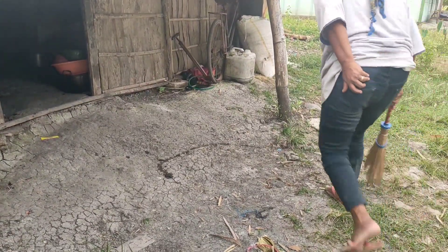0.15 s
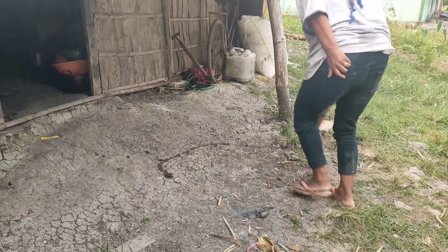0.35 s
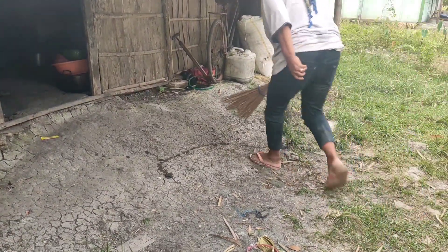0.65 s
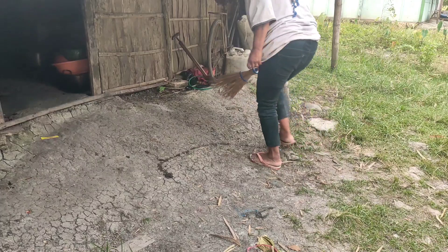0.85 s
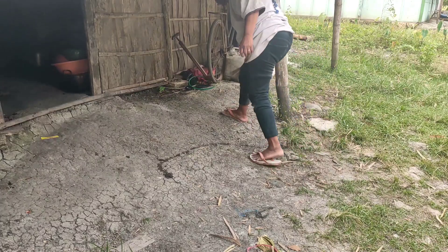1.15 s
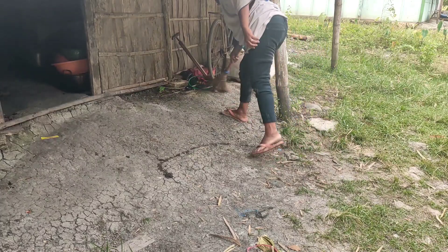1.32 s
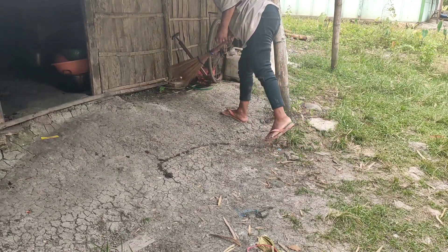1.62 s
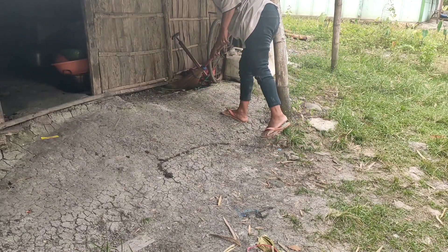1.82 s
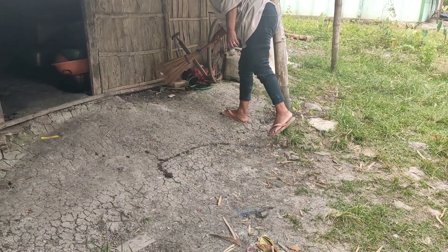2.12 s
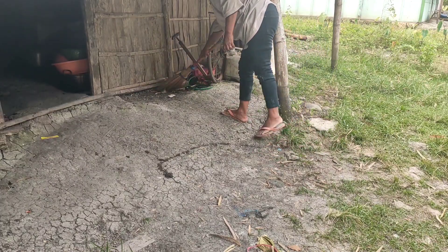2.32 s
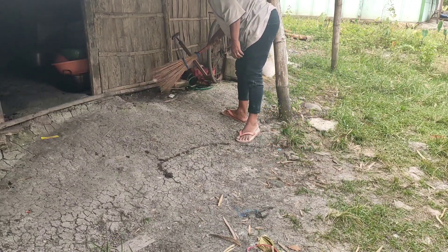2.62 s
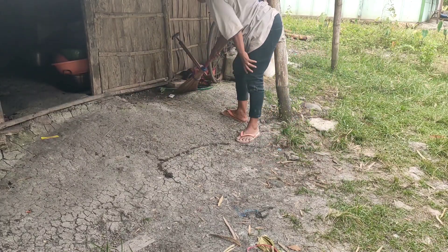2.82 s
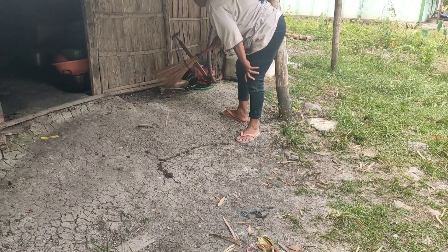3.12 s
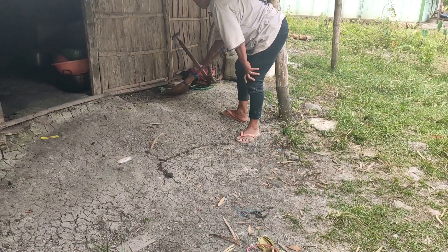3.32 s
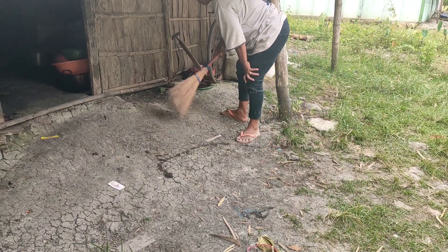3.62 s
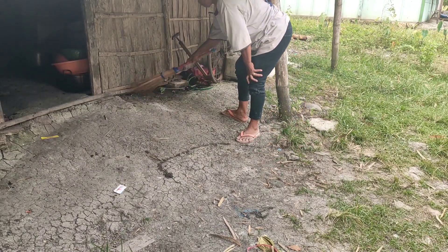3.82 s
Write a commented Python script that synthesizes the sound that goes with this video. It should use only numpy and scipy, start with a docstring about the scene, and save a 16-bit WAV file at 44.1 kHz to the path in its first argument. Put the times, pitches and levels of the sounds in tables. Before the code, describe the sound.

Sandal scuff, dull knocks and a sharp rubbery slap lead into five dry, scratchy broom strokes on bare ground in an open yard; thin chick whistles, quiet distant hush and low wind rumble at the stereo microphones.

```python
"""A stiff twig broom sweeps packed dirt in a farm yard: five scraping strokes built from uneven
clicks, hiss and snaps, with three extra touches of the twig tips. Before that, sandals scuff
the ground and slap as ringing resonances with a puff of noise; dull knocks are noise bursts.
Chicks whistle nearby as wavering sines, over a patchy bed of far-off noise and
light wind that rumbles at the two microphones."""
import sys
import numpy as np
from scipy import signal
from scipy.io import wavfile
from scipy.ndimage import uniform_filter1d

SR = 44100
rng = np.random.default_rng(int(sys.argv[2]) if len(sys.argv) > 2 else 0)


def nominal_scale(level):
    """Amplitude ratio for a level in decibels (scalar or array-like)."""
    x = np.asarray(level, float) / 20
    return 10 ** x


def output_pcm(signal):
    """Save a mono or channel-first signal as 16-bit PCM at the path in sys.argv[1].

    Samples are clipped to [-1, 1] before scaling.
    """
    pcm = np.clip(np.atleast_2d(signal).T, -1, 1) * 32767
    wavfile.write(sys.argv[1], SR, np.round(pcm).astype(np.int16))


N = 174195  # samples


def evened(x):
    """Scales to rms 1."""
    return x / np.sqrt(np.mean(x ** 2) + 1e-20)


def read(points, hz):
    """Reads a spectrum on a log frequency axis."""
    f, value = np.transpose(points)
    return np.interp(np.log(hz + 1), np.log(f + 1), value)


def curve(rows, column=1):
    """One column of a curve at every sample, -120 outside it."""
    rows = np.array(rows)
    return np.interp(np.arange(N) / SR, rows[:, 0], rows[:, column], left=-120, right=-120)


def add(mix, s, sound):
    """Mixes a sound in at time s."""
    part = mix[..., round(s * SR):][..., :sound.shape[-1]]
    part += sound[..., :part.shape[-1]]


def band(x, hz, width_hz):
    """Noise through a steep resonance that may move: shifted to 0 Hz, low-passed twice, shifted back."""
    turn = np.exp(2j * np.pi * np.cumsum(hz * np.ones(x.shape[-1])) / SR)
    r = np.exp(-np.pi * width_hz / SR)
    once = signal.lfilter([1 - r], [1, -r], x / turn)
    twice = signal.lfilter([1 - r], [1, -r], once)
    return evened((turn * twice).real)


def colour(pair, shape, same, lean, patchy_db, streaky, lead_s, sink):
    """Blends two raw signals to stereo and shapes their short-time spectra with random unevenness."""
    size = 1024
    hz, t, z = signal.stft(pair, SR, nperseg=size, noverlap=size * 3 // 4)
    # random patches vary the level across the whole spectrum
    patches, streaks = rng.standard_normal((len(t), len(hz), 2)).T
    patches = uniform_filter1d(patches, size=14, axis=0)
    patches = evened(uniform_filter1d(patches, size=6, axis=1))
    # narrow random streaks add finer unevenness, strongest in the treble
    streaks = evened(uniform_filter1d(streaks, size=9, axis=1))
    streaks = streaks * np.clip(hz / 5000, .3, 1.6)[:, None]
    # the right microphone shares part of the left one's sound, later by lead_s
    c = np.clip(read(same, hz), -1, 1)[:, None]
    late = np.exp(-2j * np.pi * hz * lead_s)[:, None]
    side = read(lean, hz)[:, None] / 2
    left = z[0] * nominal_scale(side)
    right = (c * late * z[0] + np.sqrt(1 - c ** 2) * z[1]) * nominal_scale(-side)
    # a sink above 1 moves the whole spectrum down
    sunk_hz = hz[:, None] * np.interp(t, np.arange(N) / SR, sink)
    shape_db = read(shape, sunk_hz) + patchy_db * patches + 2.07 * streaky * np.minimum(streaks, 1)
    z = np.array([left, right]) * nominal_scale(shape_db)
    return evened(signal.istft(z, SR, nperseg=size, noverlap=size * 3 // 4)[1][:, :N])


def yard(x):
    """Short diffuse tail from the shed wall and the ground: decaying softened noise as echo taps."""
    t60_s, rise_s = 0.11, 0.0063
    t = np.arange(SR // 3) / SR
    taps = rng.standard_normal((2, len(t))) * nominal_scale(-60 * t / t60_s) * np.minimum(t / rise_s, 1)
    taps = signal.lfilter([.5], [1, -.5], taps)
    return signal.oaconvolve(x, taps / np.linalg.norm(taps[0]), axes=1)[:, :N]


def air():
    """Far leaves, traffic and insects as one patchy bed of shaped noise."""
    # Spectrum of the distance. Each row: frequency in Hz, relative density in dB.
    far_spectrum = [(12, -24), (20, -62), (123, 1), (197, 4), (888, -8.5), (3690, -3.5), (4610, -10),
                    (7610, -19.5), (8750, -25), (10300, -19.5), (11900, -34), (14100, -28), (15700, -25)]
    # Likeness of the two microphones. Each row: frequency in Hz, left-right likeness from 0 to 1.
    far_same = [(60, 1), (240, 0.67), (950, 0.015), (3770, 0.048), (15000, 0.039)]
    level_db = -50
    noise = rng.standard_normal((2, N))
    return nominal_scale(level_db) * colour(noise, far_spectrum, far_same, [(20, 0), (15000, 0)],
                                  patchy_db=3.5, streaky=5.5, lead_s=0, sink=np.ones(N))


def wind():
    """Rumble in a low moving resonance, alike at both microphones, and lumpy buffeting unrelated at each."""
    # Low wind rumble. Each row: time in seconds, level in dB, centre in Hz.
    gusts = [(0.0, -50, 75.6), (0.08, -54.5, 78), (0.14, -64, 81.5), (1.0, -66, 84.5), (1.21, -59, 74.6),
             (1.29, -92, 77), (1.4, -101, 102), (1.47, -45.5, 93.5), (1.61, -61, 79.4), (1.81, -41.5, 70),
             (1.85, -63, 72), (2.07, -60, 54.7), (2.62, -63.5, 56.5), (3.0, -61.5, 56.6), (3.12, -59, 83),
             (3.16, -42, 87), (3.27, -47.5, 71), (3.33, -50, 89), (3.4, -46.5, 88.5), (3.56, -49, 72),
             (3.64, -67, 58.2), (3.76, -57, 56.0), (3.95, -69, 61.6)]
    gust_width_hz = 32.6
    buffet_db, buffet_hz, buffet_width_hz, buffet_lumps_db = -61, 37, 20, 3.5
    a, b, c, d, lumps = rng.standard_normal((5, N))
    near_alike = np.array([a + 0.18 * b, a - 0.07 * b])
    rumble = nominal_scale(curve(gusts)) * band(near_alike, curve(gusts, column=2), gust_width_hz)
    lumps = evened(uniform_filter1d(uniform_filter1d(lumps, size=4000), size=4000))
    buffeting = band(np.array([c, d]), buffet_hz, buffet_width_hz)
    return rumble + nominal_scale(buffet_db + buffet_lumps_db * lumps) * buffeting


def chicks():
    """Near-sine whistles that waver and flutter, and short gliding chirps, blurred by the yard."""
    # Chick whistles, one list per whistle. Each row: time in seconds, pitch in Hz, level in dB.
    whistles = [
        [(0.325, 4270, -55), (0.347, 3310, -46), (0.375, 3340, -50)],
        [(0.47, 4420, -51), (0.482, 4120, -52.5), (0.62, 3900, -53), (0.64, 3970, -54)],
        [(0.45, 3420, -52), (0.472, 3670, -55), (0.63, 3610, -53), (0.69, 3605, -41), (0.718, 3815, -53),
         (0.762, 3786, -45.5), (0.792, 3560, -49), (0.81, 3060, -67)],
        [(0.586, 3430, -56), (0.63, 3310, -52), (0.665, 3220, -54), (0.69, 2750, -58)],
        [(0.79, 2730, -42), (0.797, 2240, -47), (0.808, 1950, -50)],
        [(0.97, 3755, -73), (0.985, 3570, -51.5), (1.045, 3620, -47), (1.11, 3800, -50), (1.135, 3310, -58)],
        [(0.975, 4020, -67), (0.985, 3950, -57), (1.06, 3850, -57)],
        [(1.065, 2570, -55), (1.078, 3080, -49), (1.088, 3170, -52), (1.1, 2710, -50), (1.125, 2830, -56)],
        [(1.275, 3230, -62), (1.293, 3620, -59), (1.33, 3760, -57)],
        [(2.19, 4100, -51.5), (2.206, 3894, -45), (2.268, 3800, -47.5), (2.33, 3540, -46.5), (2.35, 3320, -55)],
        [(3.9, 4130, -43.5), (3.918, 4040, -58), (3.95, 4050, -49)],
    ]
    # Short chirps. Each row: start in seconds, length in seconds, start pitch in Hz, end pitch in Hz,
    # level in dB.
    chirps = [(0.251, 0.05, 4470, 3780, -56), (0.31, 0.021, 4310, 3520, -57),
              (.575, 0.011, 3000, 2300, -66), (1.133, 0.019, 2160, 1950, -54),
              (1.117, 0.028, 2960, 3280, -51), (2.333, 0.016, 2760, 1900, -49)]
    waver_share, flutter_db, yard_db = .009, 2.2, -8
    out = np.zeros(N)
    for rows in whistles:
        waver, flutter = uniform_filter1d(rng.standard_normal((2, N)), size=120, axis=1)
        hz = np.maximum(curve(rows), 0) * (1 + waver_share * evened(waver))
        level = uniform_filter1d(nominal_scale(curve(rows, column=2)), size=150)
        level = level * nominal_scale(flutter_db * evened(flutter))
        out += np.sqrt(2) * level * np.sin(2 * np.pi * np.cumsum(hz) / SR)
    for s, length_s, start_hz, end_hz, db in chirps:
        u = np.arange(0, 1, 1 / (length_s * SR))
        hz = start_hz + (end_hz - start_hz) * u
        swell = np.sqrt(np.sin(np.pi * u))
        add(out, s, np.sqrt(2) * nominal_scale(db) * swell * np.sin(2 * np.pi * np.cumsum(hz) / SR))
    out = out * nominal_scale(np.array([[-1.3], [1.3]]))  # stronger on the right
    return out + nominal_scale(yard_db) * yard(out)


def knocks():
    """Dull knocks of heels and broom head: decaying noise bursts in a broad resonance."""
    # Each row: start in seconds, centre in Hz, width in Hz, level in dB, 60 dB decay in seconds.
    knock_rows = [(0.221, 1670, 596, -47.5, 0.14), (0.374, 450, 610, -36, 0.039),
                  (1.195, 970, 600, -45.5, 0.02), (1.2852, 298, 350, -36.5, .04),
                  (1.296, 1310, 1600, -44.5, .06), (2.404, 494, 700, -41.5, 0.43),
                  (2.422, 830, 916, -31.5, 0.07), (2.44, 215, 111, -41.5, 0.61),
                  (2.598, 770, 1200, -36.5, 0.15), (3.14, 648, 604, -46.5, 0.19)]
    rise_s = .0025
    out, t = np.zeros(N), np.arange(12000) / SR
    for s, hz, width_hz, db, t60 in knock_rows:
        burst = band(rng.standard_normal(12000), hz, width_hz)
        add(out, s, burst * nominal_scale(db - 60 * t / t60) * np.minimum(t / rise_s, 1))
    return out


def slaps():
    """Each sandal slap rings the rubber sole briefly and squeezes out air; ground and wall answer."""
    # Sandal slaps. Each row: start in seconds, relative level in dB, boost above 2500 Hz in dB,
    # boost below 1000 Hz in dB, left minus right in dB.
    slap_rows = [(0.3787, -36.5, 10.5, 3.5, 1), (0.864, -20, 0, -5.5, 3)]
    # Modes of the sole. Each row: frequency in Hz, relative level in dB, 60 dB decay in seconds.
    sole_modes = [(248, -32, 0.072), (450, 0.5, 0.0059), (813, -51, 0.014), (1730, 9, 0.0038),
                  (3540, -4.5, 0.0045), (5630, -18, 0.0074), (9000, -40, 0.0037)]
    # Echoes from ground and wall. Each row: delay in seconds, level in dB.
    echoes = [(.0022, -24), (.0068, -14), (0.0104, -17)]
    rise_s, ring_db = 0.00069, 8
    puff_db, puff_t60_s, yard_db = -22, 0.086, -14.5
    out, t = np.zeros((2, N)), np.arange(4000) / SR
    for s, db, treble_db, thump_db, pan_db in slap_rows:
        ring = np.zeros(len(t))
        for hz, mode_db, t60 in sole_modes:
            tilt_db = treble_db if hz > 2500 else thump_db if hz < 1000 else 0
            ring += nominal_scale(mode_db + tilt_db - 60 * t / t60) * np.sin(2 * np.pi * hz * t)
        ring = nominal_scale(ring_db) * ring * np.minimum(t / rise_s, 1)
        gain = nominal_scale(db + np.array([[pan_db], [-pan_db]]) / 2)
        puff = evened(signal.lfilter([1], [1, -.75], rng.standard_normal(4000)))
        add(out, s, gain * (ring + puff * nominal_scale(puff_db - 60 * t / puff_t60_s)))
        for delay_s, echo_db in echoes:
            add(out, s + delay_s, nominal_scale(echo_db) * gain[::-1] * ring)  # leans to the other side
    return out + nominal_scale(yard_db) * yard(out)


def scraping():
    """Twigs, grit and scuffing soles on dirt: uneven clicks that thin out in the tails, snaps and hiss."""
    # Contact of the twigs with the ground, one list per stroke.
    # Each row: time in seconds, relative level in dB.
    strokes = [
        [(1.41, -78), (1.466, -42.5), (1.52, -32.5), (1.64, -34), (1.86, -63), (1.88, -54)],
        [(1.88, -62), (1.93, -36.5), (1.98, -42), (2.032, -32), (2.156, -33.5), (2.214, -49), (2.37, -64)],
        [(2.37, -74), (2.404, -37.5), (2.474, -42), (2.504, -34), (2.634, -33), (2.714, -49.5), (2.91, -59)],
        [(2.91, -70), (2.934, -46.5), (2.944, -60.5), (3.04, -32), (3.166, -36.5), (3.186, -44), (3.37, -60)],
        [(3.37, -70), (3.412, -45.5), (3.432, -55.5), (3.526, -31.5), (3.7, -32), (3.766, -43), (3.95, -59)],
    ]
    # Sandals scuffing dirt while walking. Each row: time in seconds, relative level in dB.
    scuff = [(0.0, -84), (0.128, -52.5), (0.35, -101)]
    # Extra touches of the twig tips. Each row: start in seconds, relative level in dB,
    # 60 dB decay in seconds.
    touches = [(2.861, -50, .015), (2.929, -39, 0.03), (3.397, -46, 0.06)]
    # Spectrum of the swish at mid-stroke. Each row: frequency in Hz, relative density in dB.
    swish_spectrum = [(150, -29), (300, -24.5), (545, -20), (1110, -14.5), (1930, -3.5), (3480, -3.5),
                      (3930, -1), (6060, -7.5), (8280, -15.5), (14400, -18.5), (15700, -21)]
    # Likeness of the two microphones. Each row: frequency in Hz, left-right likeness from 0 to 1.
    swish_same = [(60, 0.99), (300, 0.55), (1400, 0.47), (3500, 0.28), (8000, 0.085), (15000, 0.086)]
    # Lean of the swish. Each row: frequency in Hz, left minus right in dB.
    swish_lean = [(60, 22), (380, 2), (2380, 0.5), (15000, 2.5)]
    swish_db, surge_db, hiss_share = 6, 1.0, .3  # the share is of power
    # clicks thin out to single grains as contact falls below dense_db, down to the sparse share
    clicks_per_s, dense_db, sparse_share = 12000, -42.5, 0.37
    spread_db, spread_cap = 3, 2.8  # click levels vary by up to spread_db times the cap
    snaps_per_s, snap_db, snap_hz, snap_ring = 900, -7, 3600, .75  # ring: pole radius
    sag = 0.1  # the swish darkens by this share of its pitch along each stroke
    lead_s = .000055  # the left microphone hears the broom first

    level = uniform_filter1d(sum(nominal_scale(curve(rows)) for rows in strokes) + nominal_scale(curve(scuff)), size=60)
    level = level * nominal_scale(surge_db * evened(uniform_filter1d(rng.standard_normal(N), size=500)))
    for s, db, t60 in touches:
        add(level, s, nominal_scale(db - 60 * np.arange(8000) / SR / t60))

    dense = np.clip(level / nominal_scale(dense_db), sparse_share, 1)
    clicks = nominal_scale(spread_db * np.minimum(rng.exponential(1, (2, N)), spread_cap))
    clicks = clicks * rng.choice([-1, 1], (2, N))
    struck = rng.random((2, N)) < dense * clicks_per_s / SR
    clicks = evened(clicks * struck / np.sqrt(dense))  # fewer clicks are each stronger
    snaps = nominal_scale(snap_db) * rng.standard_normal(N) * (rng.random(N) < snaps_per_s / SR)
    poles = [1, -2 * snap_ring * np.cos(2 * np.pi * snap_hz / SR), snap_ring ** 2]
    snaps = signal.lfilter([1], poles, snaps)
    hiss = rng.standard_normal((2, N))
    raw = np.sqrt(hiss_share) * hiss + np.sqrt(1 - hiss_share) * clicks + snaps

    # position along the current stroke, 0 to 1
    starts = [rows[0][0] for rows in strokes] + [N / SR]
    along = np.interp(np.arange(N) / SR, starts, np.arange(len(strokes) + 1)) % 1
    swish = colour(raw, swish_spectrum, swish_same, swish_lean, patchy_db=1.5, streaky=5.0,
                   lead_s=lead_s, sink=1 + sag * (along - .5))
    return nominal_scale(swish_db) * level * swish


def scene():
    """All sources in the yard."""
    return scraping() + slaps() + knocks() + chicks() + air() + wind()


def top_cut(x):
    """Nothing passes above the cut-off."""
    return signal.sosfilt(signal.butter(12, 15580, fs=SR, output="sos"), x)


def record(dry):
    """Limits the band at the top with a steep low-pass and returns the finished sound."""
    edge_hz = 15650
    low_pass = signal.firwin(401, edge_hz, window=("kaiser", 9), fs=SR)
    mix = signal.oaconvolve(dry, low_pass[None], "same")
    return top_cut(mix)


dry = scene()
out = record(dry)
output_pcm(out)
```